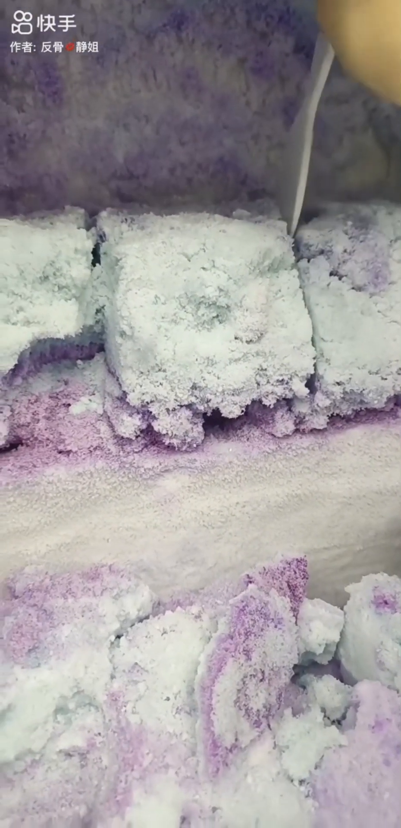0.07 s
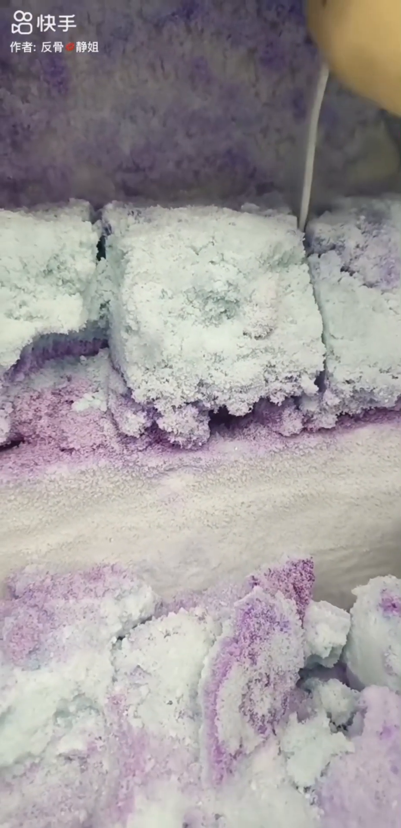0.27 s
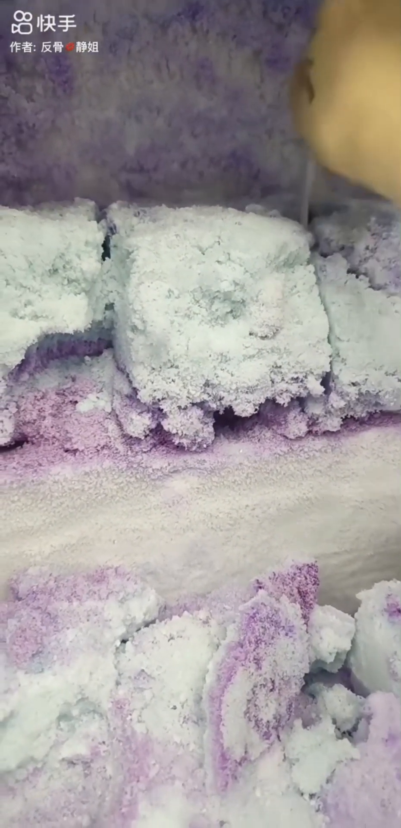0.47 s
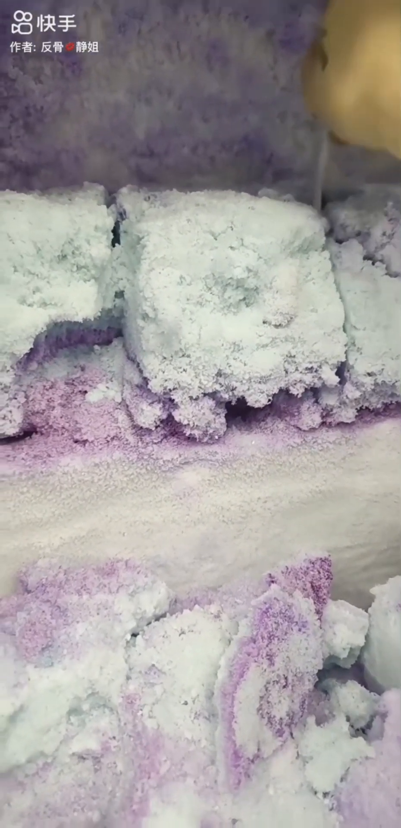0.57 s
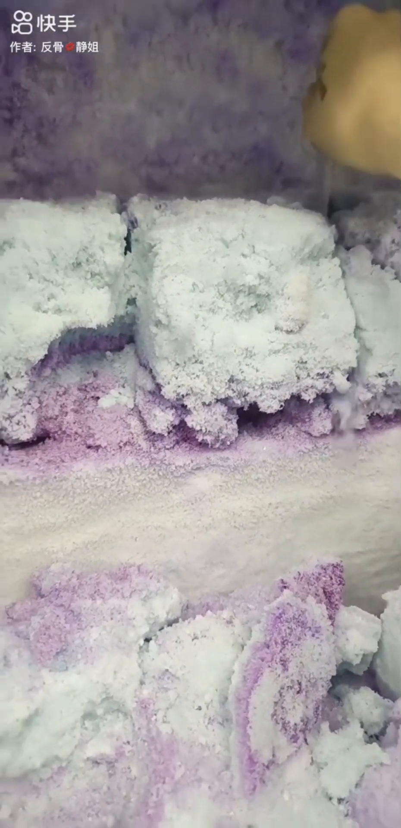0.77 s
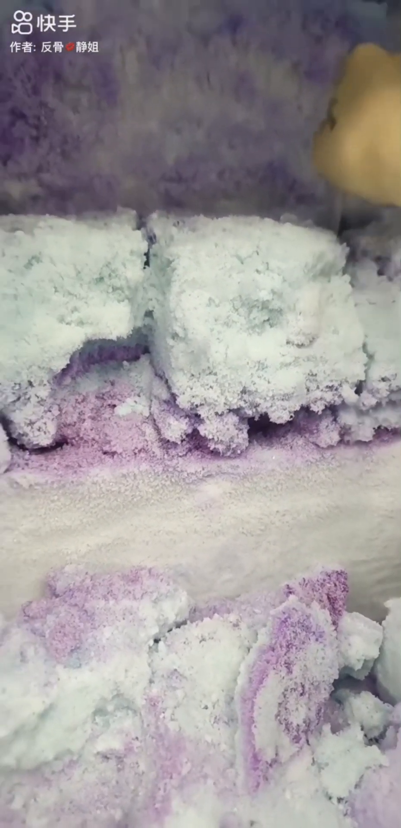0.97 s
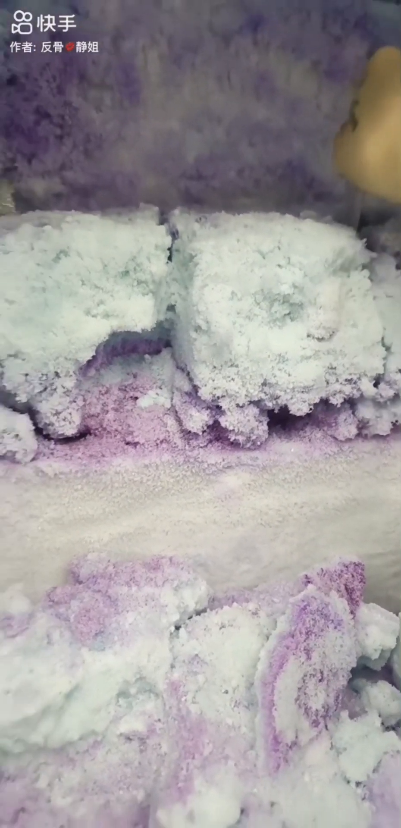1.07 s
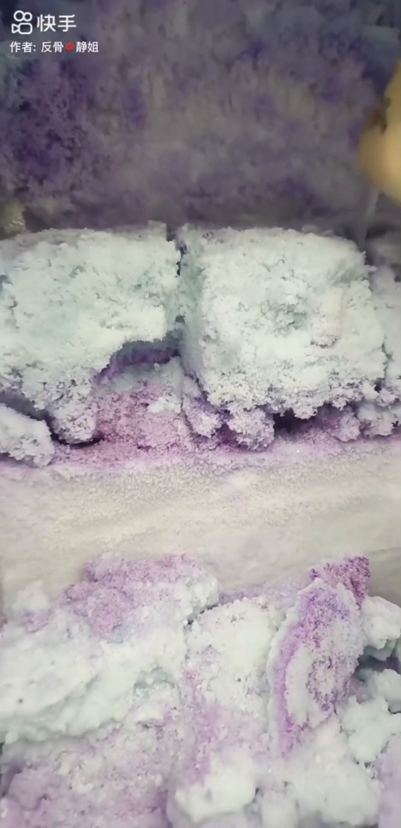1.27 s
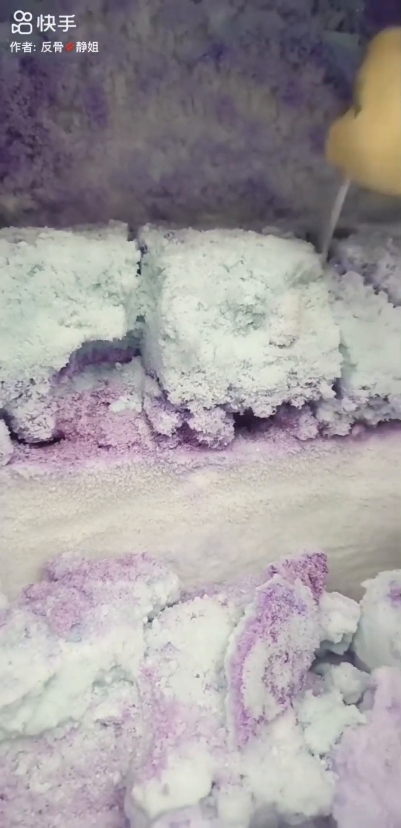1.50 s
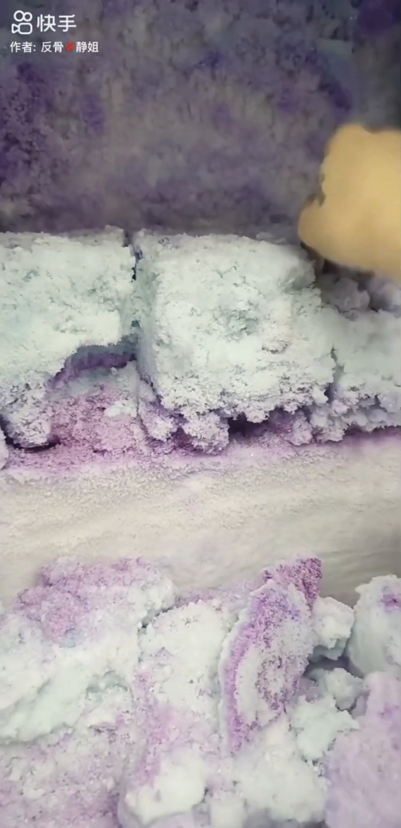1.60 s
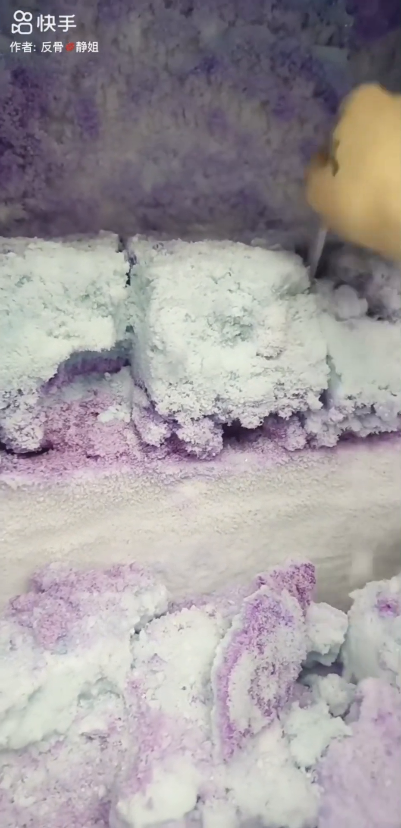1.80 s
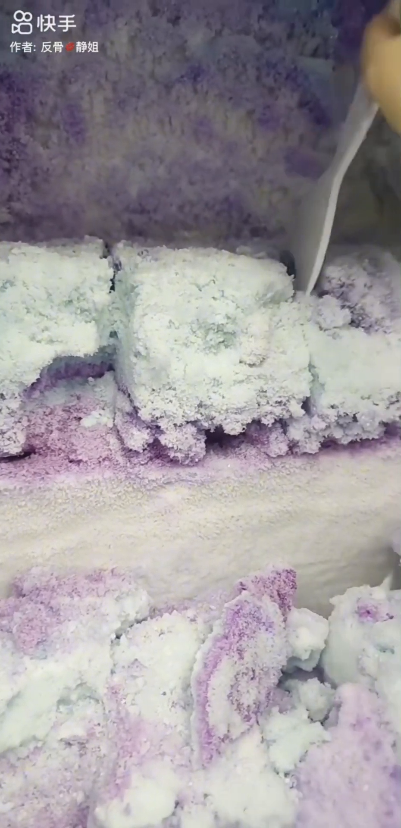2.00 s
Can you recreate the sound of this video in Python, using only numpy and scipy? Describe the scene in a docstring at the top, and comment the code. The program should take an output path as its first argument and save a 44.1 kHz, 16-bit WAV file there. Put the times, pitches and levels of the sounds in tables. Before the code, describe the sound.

A metal scraper crunches into thick frost, close up inside a freezer. It ticks and hisses with dull bumps, pries until the frost knocks and cracks off, then pushes back in with a faint squeak.

```python
"""Scraping frost in a freezer

One microphone sits close to a metal scraper as it is pushed into thick frost. The blade ticks on
the ice and shears crystals with a dry hiss, ringing as far as the frost's grip lets it. Levered, the
packed slab crunches, knocks and breaks off with a crack; the blade squeaks on its way back in.
Around the work, the compartment booms over a low hum."""
import sys
import numpy as np
from scipy import signal
from scipy.fft import rfft, irfft
from scipy.io import wavfile
from scipy.ndimage import uniform_filter1d

SR = 44100
rng = np.random.default_rng(int(sys.argv[2]) if len(sys.argv) > 2 else 0)


def master_out(mix):
    """Clip the mix to full scale and print it as 16-bit PCM to the path in sys.argv[1]."""
    frames = np.transpose(np.atleast_2d(mix))
    ceiling = np.clip(frames, -1, 1)
    pcm = np.round(ceiling * 32767).astype(np.int16)
    wavfile.write(sys.argv[1], SR, pcm)


N = 90404
T = np.arange(N) / SR


def amp(db):
    """Decibels to gain."""
    return 10 ** (np.asarray(db) / 20)


def unit(x):
    """Scale to rms 1."""
    return x / np.sqrt(np.mean(x ** 2) + 1e-20)


def curve(points):
    """Join (time, value) points with straight lines."""
    return np.interp(T, *np.transpose(points))


def steady(x, samples=1100):
    """Even out the slow level of a texture, keeping its grain."""
    power = uniform_filter1d(uniform_filter1d(x * x, samples), samples)
    return x / np.sqrt(power + 1e-12)


def colour(x, spectrum):
    """Give a texture a spectrum."""
    hz, db = np.transpose(spectrum)
    bins_hz = np.fft.rfftfreq(2 * N, 1 / SR) + 1
    gain = amp(np.interp(np.log(bins_hz), np.log(hz), db))
    return irfft(rfft(x, 2 * N) * gain)[:N]


def filtered(x, kind, hz, order):
    """Low-, high- or band-pass a signal."""
    return signal.sosfilt(signal.butter(order, hz, kind, fs=SR, output="sos"), x)


def drift(width_hz):
    """Random wander of rms 1."""
    return unit(filtered(rng.standard_normal(2 * N), "low", width_hz, order=2)[N:])


def grains(per_s, spread_db):
    """Random fractures, many small and a few large."""
    sizes = amp(spread_db * np.minimum(rng.exponential(1, N), 4))
    signs = rng.choice([-1, 1], N)
    return sizes * signs * (rng.random(N) < per_s / SR)


def resonate(x, modes):
    """Parallel resonances, each with its given gain at the peak."""
    out = 0
    for hz, db, width in modes:
        radius = np.exp(-np.pi * width / SR)
        feedback = [1, -2 * radius * np.cos(2 * np.pi * hz / SR), radius ** 2]
        out += amp(db) * (1 - radius ** 2) / 2 * signal.lfilter([1, 0, -1], feedback, x + 1e-18)
    return out


def blend(direct, ring, ring_db):
    """Mix two textures at constant power."""
    return (direct + amp(ring_db) * ring) / np.sqrt(1 + amp(2 * ring_db))


# Air of the room around the freezer: (frequency [Hz], relative level [dB])
ROOM_SPECTRUM = [(20, -36), (60, -2), (85, 7.5), (140, -8), (300, -15), (600, -19), (1300, -26),
                 (3300, -26.5), (6000, -37.5), (15000, -37)]


def hum_and_room(hum_hz=98.9, room_db=-56):
    """A low wavering hum that sinks as the work starts, over faint room noise."""
    hum_db = curve([(0, -44.5), (0.36, -58)]) + 0.27 * drift(12)
    hum = amp(hum_db) * np.sqrt(2) * np.sin(2 * np.pi * hum_hz * T)
    return hum + amp(room_db) * unit(colour(rng.standard_normal(N), ROOM_SPECTRUM))


# Modes of the metal blade: (frequency [Hz], gain [dB], width [Hz])
BLADE_MODES = [(1575, -7.5, 41), (1814, -1.5, 63), (2047, -9, 140), (3340, -1.5, 85), (3624, 1.5, 60),
               (3776, 2.5, 98), (4033, -2, 73), (5500, -7, 47), (6400, -17, 88), (6770, 3.5, 200),
               (7090, -7, 68), (7500, -7, 50), (10030, -1, 120), (11600, -9.5, 470), (12240, -4, 120),
               (13700, 4, 170)]
# Fine crystals and coarser grains, heard close up: (frequency [Hz], relative level [dB])
HISS_SPECTRUM = [(1200, -59), (2400, -4.5), (3000, -2.5), (3600, -1), (4400, -2), (5100, -2.5),
                 (6500, -3.5), (8100, -1.5), (9200, -6), (10000, -5), (11800, -0.5), (14200, -1),
                 (15500, -4.5)]
RASP_SPECTRUM = [(700, -21), (1300, -35), (1600, -3), (1900, 0.5), (2230, 0.5), (2650, -10), (3300, -16.5),
                 (6000, -53)]
# The blade catches on hard ice:
# (time [s], level [dB], time to fall 60 dB [s], ring against burst [dB], favoured pitch [Hz])
ICE_CATCHES = [(0.137, -52.5, 0.025, 12, 1800), (0.15, -52.5, 0.066, -3, 3700),
               (0.1742, -26.5, 0.021, -12, 1400), (0.223, -31, .02, -11, 6800),
               (0.294, -20.5, 0.02, -10, 3780), (.331, -31.5, 0.035, -9, 1950),
               (0.3707, -15, 0.013, -20, 6800), (.416, -51, .04, -11, 2100), (0.576, -14, 0.0096, 4, 3640),
               (0.667, -37, 0.039, -1, 3700), (0.7105, -30, 0.026, -4, 3800),
               (0.909, -40, 0.017, -10, 3700), (1.017, -36, 0.036, -4, 3730),
               (1.107, -32.5, 0.028, 0, 3700), (1.2554, -22.5, .01, -19, 4850),
               (1.28, -34.5, 0.031, 8, 2070), (1.414, -37, .03, 4, 12400), (1.533, -31.5, 0.061, 16, 6850),
               (1.586, -23.5, 0.026, 24, 6740), (1.686, -20.5, .03, -3, 13000)]
CRYSTALS_PER_S = 6000


def ticks(rise_s=0.0016, rasp_db=-15, focus_db_per_octave=24):
    """Each catch bursts a cluster of crystals; the blade rings on, most near one pitch."""
    snaps = steady(grains(CRYSTALS_PER_S, spread_db=3.5), samples=100)
    hiss = steady(colour(snaps, HISS_SPECTRUM), samples=200)
    burst = hiss + amp(rasp_db) * steady(colour(snaps, RASP_SPECTRUM))
    out = 0
    for start, db, t60, ring_db, pitch in ICE_CATCHES:
        modes = [(hz, gain_db - focus_db_per_octave * abs(np.log2(hz / pitch)), width)
                 for hz, gain_db, width in BLADE_MODES]
        age = np.maximum(T - start, 0)
        force = amp(db - 60 * np.minimum(age / t60, 3)) * (1 - np.exp(-age / rise_s))
        ring = unit(resonate(force * snaps, modes)) * np.std(force * burst)
        out += blend(force * burst, ring, ring_db)
    return out


# The scraper's moves in front of the microphone, each layer on its own relative scale:
# (time [s], hiss [dB], rasp [dB], crunch [dB], rumble [dB])
FIRST_SCRATCHES = [(0.185, -44, -62, -53.5, -39), (0.2, -42, -54.0, -60, -51), (0.228, -39, -57, -51, -48),
                   (0.248, -38.0, -42, -46, -36), (0.28, -52.0, -63.0, -61, -40),
                   (0.305, -47, -40.5, -44, -34.5), (0.322, -35, -48.0, -46, -35.5),
                   (0.34, -44, -42, -35.5, -26.5), (0.364, -53.5, -61, -42.5, -40)]
PLUNGE = [(0.379, -33.5, -39, -34, -45), (0.42, -25, -34, -31.5, -19), (0.448, -34.5, -41, -34.5, -46),
          (0.485, -26.5, -35.5, -31.5, -21), (0.53, -31.0, -36.5, -31.5, -22),
          (0.564, -29.0, -40.5, -28, -21.5), (0.59, -39.5, -46, -34, -45), (0.615, -53, -59, -38.5, -47.0),
          (0.65, -54.0, -54, -38.0, -42)]
SECOND_PUSH = [(0.679, -51, -50.5, -31, -28.5), (0.7, -59, -55.0, -34, -34), (0.73, -46.0, -43, -28.5, -31),
               (0.769, -36.5, -50, -29.5, -36.0), (0.796, -42.0, -42.5, -31, -42),
               (0.832, -65.5, -64, -41.5, -42), (0.885, -63, -56, -38, -53.0),
               (0.925, -70, -64.0, -37, -43)]
LEVERING = [(0.95, -46.5, -50, -39.5, -35.5), (0.983, -44.5, -45.5, -27, -30.5),
            (1.003, -56.5, -51, -38, -38.5), (1.041, -59.5, -58.0, -40, -41),
            (1.062, -41.5, -48.5, -28, -42), (1.095, -47.5, -56, -32.5, -40),
            (1.125, -38.0, -41.5, -24, -33), (1.151, -37.5, -37, -26.5, -30.5),
            (1.175, -56.5, -55, -31.5, -31), (1.21, -70, -62, -47, -61), (1.25, -58.0, -72, -45.0, -46)]
SETTLING = [(1.263, -56, -59, -25, -29), (1.286, -55, -39, -32.5, -42), (1.309, -56, -54, -36.5, -37),
            (1.346, -62.5, -60, -41, -61), (1.39, -59.5, -72, -51.5, -55)]
LIFT = [(1.42, -49, -77, -51, -65), (1.455, -44.5, -59, -50, -66), (1.474, -44.5, -61, -40, -54),
        (1.53, -42.5, -53, -48.5, -48), (1.57, -48, -65, -48.5, -53)]
STAB = [(1.596, -37.5, -50, -47, -47), (1.65, -38, -48, -39.5, -37.5), (1.71, -34.5, -47.5, -36, -34.0),
        (1.733, -33, -38, -29.0, -33), (1.758, -42.0, -41.5, -34, -44), (1.781, -39.5, -32, -30.0, -35),
        (1.803, -57, -51.5, -42, -67), (1.851, -64.5, -61, -55.5, -52), (1.91, -62.5, -68, -63, -63)]
WITHDRAWAL = [(1.93, -42.5, -47, -54, -67), (1.95, -41.5, -48, -48, -50.0), (1.985, -45.5, -51, -47, -43),
              (2.02, -48.5, -71, -52.5, -47), (2.05, -46, -56, -54, -70)]


def stroke_gains(first_touch_s=0.1693, fade_s=0.02):
    """The moves set the gains of hiss, rasp, crunch and rumble from the first touch on."""
    moves = [FIRST_SCRATCHES, PLUNGE, SECOND_PUSH, LEVERING, SETTLING, LIFT, STAB, WITHDRAWAL]
    times, *levels = np.vstack(moves).T
    touching = np.clip((T - first_touch_s) / fade_s, 0, 1)
    return [touching * amp(np.interp(T, times, db)) for db in levels]


# How freely the blade rings in the frost: (time [s], ring against hiss [dB])
BLADE_FREEDOM = [(.2, 17), (.25, -2), (.32, -12), (.4, -16), (.56, -9), (.67, -8), (.76, -7.5), (1.36, -14),
                 (1.44, -1), (1.54, 0.5), (1.63, -4.5), (1.74, -9.5), (1.93, -9), (2.03, 2.5)]


def shearing(hiss_gain, rasp_gain, hiss_db=0.5, rasp_db=-3, judder_db=1.3, flicker_db=4.5):
    """Crystals snap under the juddering edge and ring the blade; coarser grains rasp."""
    judder = amp(judder_db * drift(103))
    snaps = grains(CRYSTALS_PER_S, spread_db=2)
    # Each mode comes and goes as the contact moves.
    ring = sum(amp(flicker_db * drift(27)) * resonate(snaps, [mode]) for mode in BLADE_MODES)
    ring = filtered(ring, "band", (1230, 15200), order=4)
    hiss = blend(steady(colour(snaps, HISS_SPECTRUM)), steady(ring), curve(BLADE_FREEDOM))
    rasp = steady(colour(grains(per_s=1500, spread_db=1.5), RASP_SPECTRUM))
    return judder * (amp(hiss_db) * hiss_gain * hiss + amp(rasp_db) * rasp_gain * rasp)


# Modes of the freezer compartment around the blade: (frequency [Hz], gain [dB], width [Hz])
COMPARTMENT_MODES = [(125, 13, 4.1), (221.3, 1.5, 42), (244.7, 1, 13), (307, -10.5, 4.7), (358.4, 2, 12.7),
                     (406, 0, 32), (476.6, -7.5, 18.5), (580, -7, 10), (613.5, 0.5, 17), (697, -16, 10),
                     (840, -14, 92), (1035, -6, 17)]
# Packed frost giving way at close range: (frequency [Hz], relative level [dB])
CRUNCH_SPECTRUM = [(100, -51), (190, -4.5), (245, 2), (400, -2), (600, -9.5), (800, -22), (1050, -29),
                   (1500, -22.5), (4000, -72)]
CRUMB_SPECTRUM = [(300, -20), (520, 1), (850, -7), (1080, -6), (1350, -10.5), (2200, -28), (4000, -61)]
RUMBLE_SPECTRUM = [(20, -36), (45, -47), (62, -20), (95, -22), (122, 7), (160, -1), (200, -7.5),
                   (300, -23.5), (900, -92)]
# Crumbs break loose as the slab is levered: (time [s], crumbs against crunch [dB])
CRUMB_LEVELS = [(.25, -17), (.5, -16), (.66, -16), (.78, -11), (.95, -10.5), (1.15, -9.5), (1.23, -7),
                (1.3, -6), (1.47, -14), (1.68, -13.5), (1.79, -7.5), (2.0, -7)]


def crunching(crunch_gain, rumble_gain, crunch_db=-0.5, rumble_db=-1.5, slips_per_s=600):
    """Packed frost collapses in small slips that sound through the compartment, and sheds crumbs."""
    slips = colour(grains(slips_per_s, spread_db=3), CRUNCH_SPECTRUM)
    compartment = unit(resonate(slips, COMPARTMENT_MODES))
    crunch = steady(blend(unit(slips), compartment, ring_db=0), samples=700)
    crumbs = steady(colour(grains(per_s=1200, spread_db=0.5), CRUMB_SPECTRUM))
    crunch += amp(curve(CRUMB_LEVELS)) * crumbs
    rumble = steady(colour(grains(slips_per_s, spread_db=3), RUMBLE_SPECTRUM))
    return amp(crunch_db) * crunch_gain * crunch + amp(rumble_db) * rumble_gain * rumble


# Hard shoves reach the freezer wall behind the frost: (time [s], level [dB], pitch [Hz])
WALL_SHOVES = [(0.229, -31.5, 124), (.326, -25.5, 140), (0.41, -15.5, 141), (0.502, -37.5, 126.7),
               (0.553, -31, 115), (.662, -31, 126.8), (0.767, -28.5, 121), (0.95, -41, 127),
               (1.12, -31.5, 126), (1.25, -35.5, 123), (1.717, -28, 149), (1.967, -37, 126)]


def booms(rise_s=0.019, sharpness=2.13):
    """The wall's boom swells and dies within a few cycles of each shove."""
    out = 0
    for start, db, hz in WALL_SHOVES:
        age = np.maximum(T - start, 0)
        swell = (age / rise_s * np.exp(1 - age / rise_s)) ** sharpness
        out += amp(db) * swell * np.sin(2 * np.pi * hz * age)
    return out


# The slab gives way in jerks, near the microphone: (time [s], level [dB], nominal pitch [Hz])
SLAB_FRACTURES = [(.668, -30, 290), (.712, -25, 413), (.745, -29, 414), (0.764, -26, 304), (.870, -47, 586),
                  (.911, -27.5, 477), (0.9518, -20, 500), (0.959, -24.5, 423), (0.977, -36, 600),
                  (1.019, -14.5, 427), (1.029, -29, 300), (1.055, -22, 570), (1.0714, -20.5, 480),
                  (1.1071, -17.5, 413), (1.1165, -30, 352), (1.126, -24.5, 407), (1.13, -31, 550),
                  (1.1475, -16, 410), (1.1559, -24, 322), (1.2554, -18.5, 616), (1.2573, -7, 506),
                  (1.268, -35.5, 337), (1.777, -24, 520)]


def knocks(low_cut_hz=215, octaves_above_pitch=0.76, edge_db=-20.5, echo_s=0.00292, ring_db=1):
    """Each fracture is a dull pulse with a harder edge; the compartment rings after it."""
    direct = np.zeros(N)
    for start, db, hz in SLAB_FRACTURES:
        click = signal.unit_impulse(N, int(start * SR)) + 1e-18
        body = filtered(click, "high", low_cut_hz, order=3)
        body = filtered(body, "low", hz * 2 ** octaves_above_pitch, order=5)
        edge = filtered(click, "band", (1400, 2300), order=3)
        direct += amp(db) * (body / abs(body).max() + amp(edge_db) * edge / abs(edge).max())
    echo = np.roll(direct, int(echo_s * SR))
    return direct + amp(ring_db) * resonate(echo, COMPARTMENT_MODES)


# The blade squeaks as it is pushed back into the frost: (time [s], pitch [Hz], level [dB])
SQUEAK_PATH = [(1.42, 3700, -66), (1.55, 3850, -70), (1.591, 4200, -50), (1.645, 4175, -44),
               (1.67, 3860, -45), (1.72, 3800, -64), (1.77, 3770, -65)]


def squeak(roughness_hz=150, fade_s=0.02):
    """A rough, narrow friction tone that slides with the point of contact."""
    times, hz, db = np.transpose(SQUEAK_PATH)
    phase = 2 * np.pi * np.cumsum(np.interp(T, times, hz)) / SR
    tone = steady(drift(roughness_hz) * np.sin(phase) + drift(roughness_hz) * np.cos(phase))
    gate = np.clip(np.minimum(T - times[0], times[-1] - T) / fade_s, 0, 1)
    return gate * amp(np.interp(T, times, db)) * tone


def scene():
    """Blade, frost and freezer at one close microphone."""
    hiss_gain, rasp_gain, crunch_gain, rumble_gain = stroke_gains()
    blade = shearing(hiss_gain, rasp_gain) + ticks() + squeak()
    slab = crunching(crunch_gain, rumble_gain) + knocks()
    freezer = booms() + hum_and_room()
    return (blade + slab + freezer)[None]


def record(dry, cutoff_hz=15600):
    """The highest treble is cut steeply."""
    return signal.sosfilt(signal.ellip(12, .1, 90, cutoff_hz, fs=SR, output="sos"), dry)


dry = scene()
out = record(dry)
master_out(out)
```